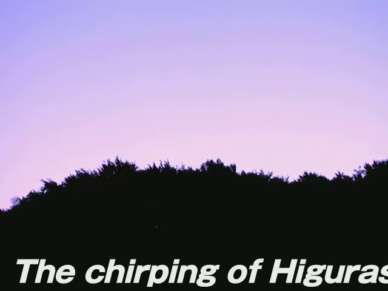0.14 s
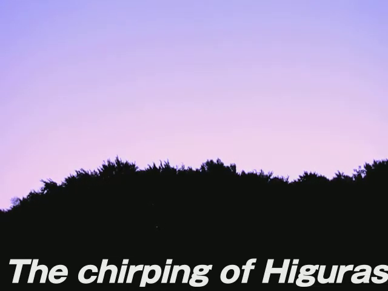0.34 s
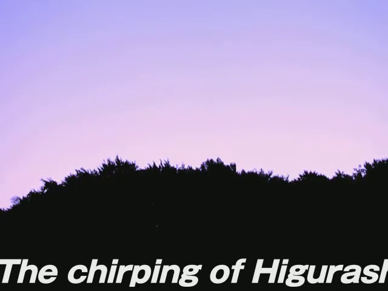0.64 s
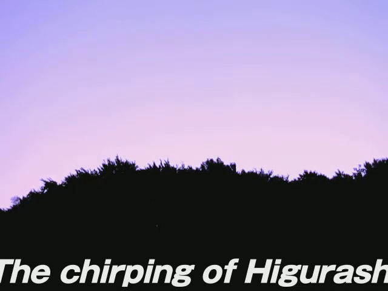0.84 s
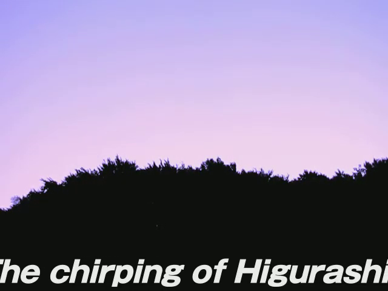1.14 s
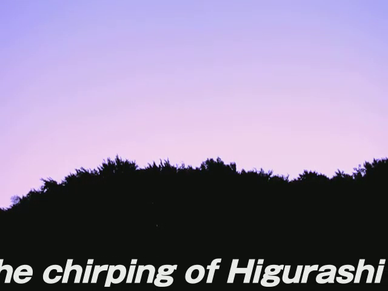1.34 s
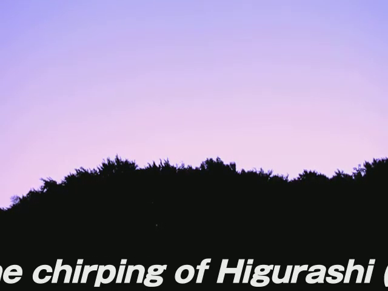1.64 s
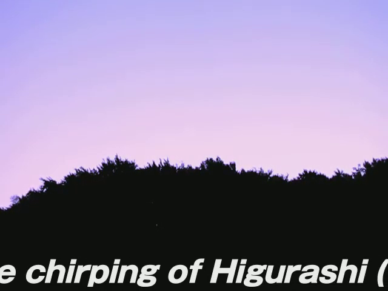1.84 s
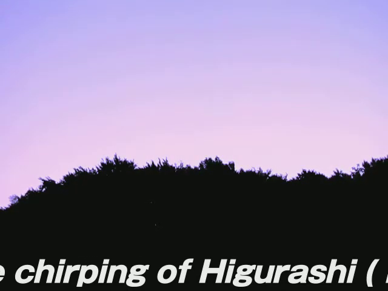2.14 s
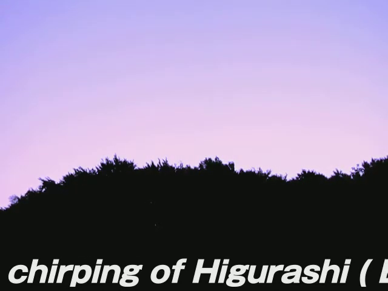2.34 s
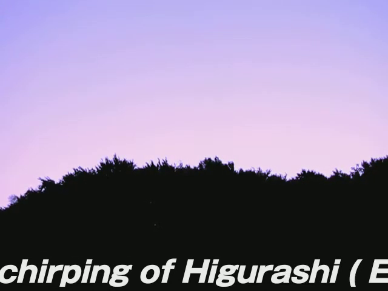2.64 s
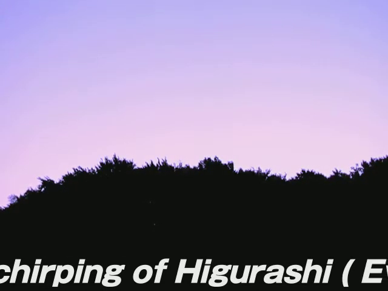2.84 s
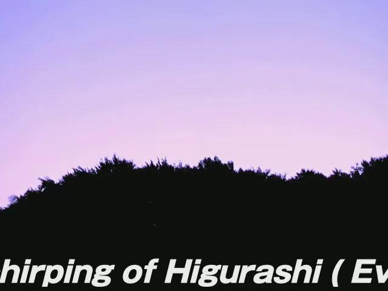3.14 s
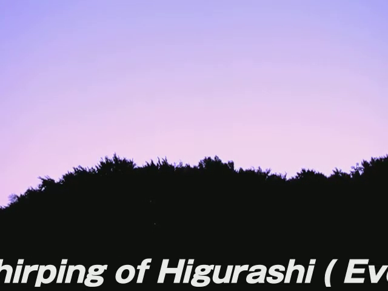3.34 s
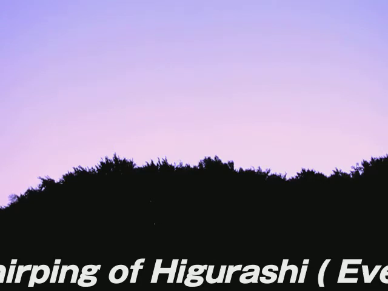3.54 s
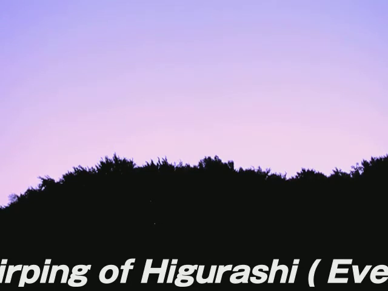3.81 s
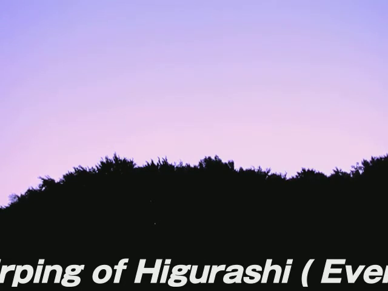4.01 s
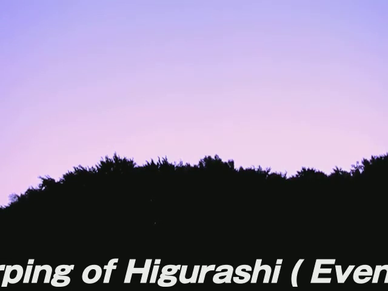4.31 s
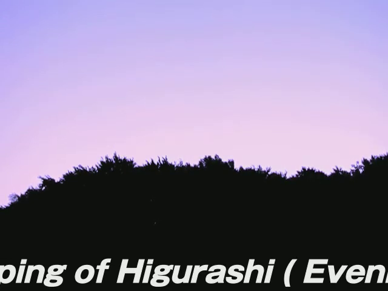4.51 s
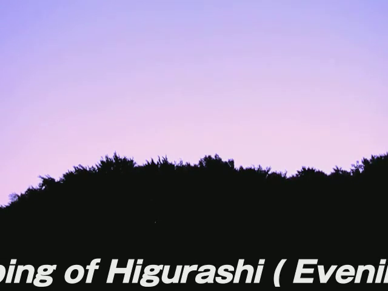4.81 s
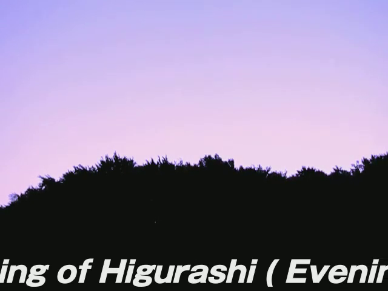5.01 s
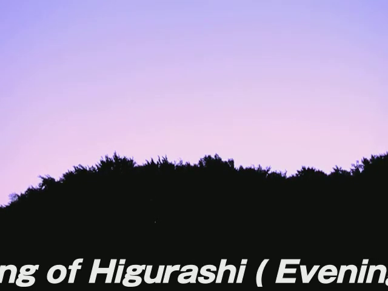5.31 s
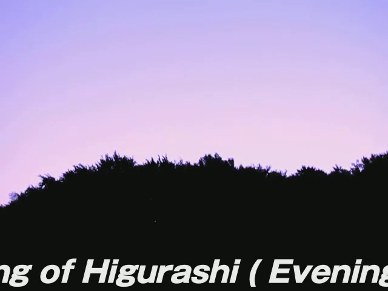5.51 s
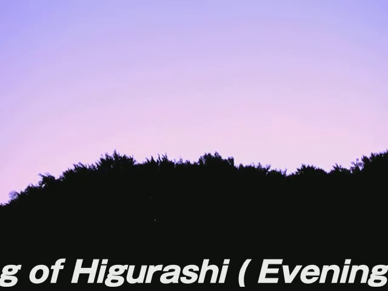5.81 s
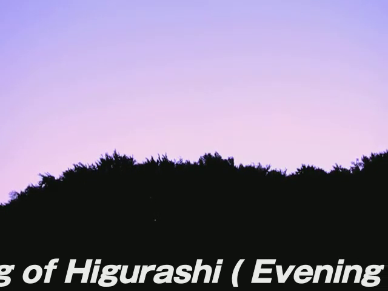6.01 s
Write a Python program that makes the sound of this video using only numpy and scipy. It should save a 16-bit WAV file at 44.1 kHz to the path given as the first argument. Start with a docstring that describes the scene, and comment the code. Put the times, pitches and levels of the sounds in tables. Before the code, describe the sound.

A stereo microphone at the wood's edge takes in layered cicadas: pulsing trains around nine notes a second, a far chorus blending into a ring, and a very high constant insect shimmer. Rasping rising bird screeches come regularly on the left early on, followed by short clear whistles on either side and a few yelps. Later birds thin out, a faint dull tick passes, and distant machinery hums very softly.

```python
"""Evening cicadas are heard first, calling at the edge of a wood at dusk in overlapping trains of quick
high notes: swelling, buzzing tones with strong octaves. A small cicada rings steadily near 8 kHz, as a
comb of click harmonics under a body resonance. Bulbuls screech and whistle, as gliding and fluttering
harmonic tones. Trees and slope scatter the calls as decaying noise echoes. Behind them far machinery
hums as wavering tones, shaped noise gives the valley's rumble and rustle, and one faint tick sounds."""
import sys
import numpy as np
from scipy import signal
from scipy.fft import rfft, irfft, next_fast_len
from scipy.io import wavfile
from scipy.ndimage import uniform_filter1d, map_coordinates

SR = 44100
rng = np.random.default_rng(int(sys.argv[2]) if len(sys.argv) > 2 else 0)


def transcribe(u):
    """Save the signal u as a 16-bit wav file named by the first command-line argument.

    u: samples, shape (n,) or (channels, n), limited to [-1, 1]; the rate is SR.
    q: integer samples, one column per channel.
    """
    v = np.clip(np.atleast_2d(u).T, -1, 1)
    q = np.round(v * 32767).astype(np.int16)
    wavfile.write(sys.argv[1], SR, q)


N = 271656
TIME = np.arange(N) / SR  # s


def near_cicadas(length=.07, sag=.018, rough=.011, low_db=-6, high_db=-8, third_db=-10,
                 wet_db=-3, octave_side_db=6):
    """Resonant radiation: each note is a swell of tymbal buzz; the hollow belly lifts the octave."""
    out, sent = np.zeros((2, N)), np.zeros(N)
    u = np.linspace(0, 1, int(length * SR))  # share of the note
    for s, db, hz, side_db, octave_db in notes():
        sinking = sag * (1 - 2 * u)
        phase = cycles(hz * (1 + sinking + rough * wobble(695, len(u))))
        swell = amp(db - 7) * np.sin(np.pi * u)
        low = amp(low_db) * swell * np.sin(phase)
        overtones = amp(octave_db) * np.sin(2 * phase) + amp(third_db) * np.sin(3 * phase)
        high = amp(high_db) * swell * overtones
        start = s - length / 2
        add(out, start, panned(low, side_db) + panned(high, side_db + octave_side_db))
        add(sent, start, low / 2 + high)
    return out + amp(wet_db) * surrounding(sent)


# Calls of the nearer evening cicadas, each a train of notes:
# (first note [s], last note [s], notes [count], last gap over first gap [ratio], first pitch [Hz],
#  last pitch [Hz], relative level [dB], fade [dB/s], left over right [dB], relative octave level [dB])
NEAR_CALLS = [(-.031, 2.009, 15, 1.93, 2112, 2056, -25, 2.6, -7, 1.5),
              (-.035, .905, 9, 1.05, 2190, 2165, -30, 3, -5, 3),
              (1.14, 2.01, 9, 1.02, 2205, 2145, -30, 3, -5.5, 3),
              (2.135, 3.78, 16, 1.06, 2158, 2134, -29.5, 3, -7, 9),
              (2.783, 4.39, 16, 1.08, 2250, 2200, -26.5, 2.5, -5, -4),
              (4.39, 5.129, 8, 1.0, 2120, 2102, -30.5, 0, -5, -9),
              (5.19, 6.11, 9, 1.0, 2178, 2160, -30.3, -1.5, -5.5, -1)]
DRAG_POWER = 3.4  # the slowing comes late in a call
ONSET_DB, ONSET_S = -7, .09  # a call starts softly and strengthens within a few notes
NOTE_SCATTER_DB, NOTE_SCATTER_HZ = 1, 6  # no two notes are quite alike


def notes():
    """Pulse-train timing: widening gaps, gliding pitch, soft onset and a steady drift of level."""
    for first, last, count, drag, first_hz, last_hz, db, fade, side_db, octave_db in NEAR_CALLS:
        gaps = 1 + (drag - 1) * np.linspace(0, 1, round(count) - 1) ** DRAG_POWER
        for u in np.append(0, np.cumsum(gaps)) / gaps.sum():
            age = u * (last - first)
            level = db + ONSET_DB * np.exp(-age / ONSET_S) - fade * age
            level += NOTE_SCATTER_DB * rng.standard_normal()
            hz = first_hz + (last_hz - first_hz) * u + NOTE_SCATTER_HZ * rng.standard_normal()
            yield first + age, level, hz, side_db, octave_db


# Trains of farther evening cicadas: (start [s], end [s], first pitch [Hz], last pitch [Hz],
#  note rate at the start [1/s], relative level [dB])
FAR_TRAINS = [(-1.2, 2.6, 2225, 2150, 9.3, -40), (-2, 1.9, 2170, 2085, 8.6, -38),
              (.85, 1.7, 2130, 2115, 9.3, -38), (1.9, 5.9, 2170, 2105, 9.5, -43),
              (2.2, 2.95, 2165, 2140, 9.2, -34.5), (2.6, 5.4, 2255, 2180, 9.2, -46),
              (3.8, 7.5, 2130, 2090, 9, -47), (4, 5.3, 2285, 2260, 9.6, -53),
              (5.62, 9, 2265, 2220, 9.8, -35), (6.04, 9, 2150, 2090, 9.3, -26)]
# Blended spectrum of the farthest evening cicadas: (frequency [Hz], relative level [dB])
CHOIR_SPECTRUM = [(1900, -49), (2040, -9), (2115, 7), (2210, 5.5), (2340, -33), (3800, -35), (4100, -5.5),
                  (4260, 2), (4450, -3), (4750, -34.5)]


def far_cicadas(sag=0.011, rough=.013, slowing=.035, low_db=-49.3, third_db=-16, wet_db=2, choir_db=-47):
    """Superposition: trains of notes slow and sink; the farthest callers blend into a steady ring."""
    low, high = np.zeros(N), np.zeros(N)
    for start, end, first_hz, last_hz, rate, db in FAR_TRAINS:
        age = TIME - start
        u = np.clip(age / (end - start), 0, 1)  # share of the train
        beat = (rate * age * (1 - slowing * age / 2) + rng.random()) % 1  # share of the note
        pitch = first_hz + (last_hz - first_hz) * u
        phase = cycles(pitch * (1 + sag * (1 - 2 * beat) + rough * wobble(800)))
        train_swell = np.sqrt(np.abs(np.sin(np.pi * u)))
        swell = amp(db) * train_swell * np.sin(np.pi * beat)
        low += swell * np.sin(phase)
        high += swell * (np.sin(2 * phase) + amp(third_db) * np.sin(3 * phase))
    # the long waves reach both ears alike; the octave is scattered apart
    low = panned(unit(low + surrounding(low)[0]), -7.5)
    high = panned(high + amp(wet_db) * surrounding(high), 3.1)
    return amp(low_db) * low + high + amp(choir_db) * rush(CHOIR_SPECTRUM)


# The small cicada's tymbal: (time [s], mean click rate [1/s])
CLICK_RATE = [(0, 453.5), (1.5, 455), (2.7, 457.2), (3.5, 458.6), (4.4, 460.6), (5.1, 466), (5.6, 476),
              (6.16, 488)]
# The small cicada's ring: (time [s], level [dB], body resonance [Hz])
RINGING = [(0, -39.5, 8080), (1.08, -38, 8090), (2.25, -40.5, 8090), (4.17, -40, 7906), (4.6, -41.3, 7720),
           (5.37, -42.5, 7630), (5.73, -43.5, 7750), (6.16, -42.5, 7650)]
# Spectrum of distant small cicadas: (frequency [Hz], relative level [dB])
HISS_SPECTRUM = [(5000, -46), (6100, -15), (6350, -10.5), (6800, -14), (7400, -12), (8100, -6), (8700, -8),
                 (9200, -21.5), (10300, -20), (11200, -31), (15000, -50)]


def small_cicada(width_hz=520, upper_db=-7, lower_db=-3, between_db=-14, jitter=.0013,
                 tone_db=-1.5, hiss_db=-5, wet_db=-5):
    """Harmonic comb and resonance: ribs click in uneven groups of four under the body's resonance."""
    db, centre_hz = curves(RINGING)
    group_hz = curves(CLICK_RATE)[0] / 4 * (1 + jitter * wobble(160))
    phase = cycles(group_hz)
    pattern = amp([0, upper_db, between_db, lower_db])  # every fourth line is strongest
    tone = np.zeros(N)
    for k in range(60, 85):
        body = 1 / (1 + ((k * group_hz - centre_hz) / width_hz) ** 2)
        tone += pattern[k % len(pattern)] * body * np.sin(k * phase + 2 * np.pi * rng.random())
    ring = unit(tone + amp(wet_db) * surrounding(tone))
    return amp(db) * (amp(tone_db) * ring + amp(hiss_db) * rush(HISS_SPECTRUM))


# Bulbul call shapes: (share of the call [0-1], pitch over the reference pitch [ratio],
#  relative level [dB], buzz depth over the pitch [ratio])
SCREECH_SHAPE = [(0, .46, -22, 0), (.04, .575, -8, .012), (.17, .635, -6, .03), (.27, .70, -.5, .02),
                 (.5, .905, .5, .065), (.72, .99, -2, .025), (.87, 1, -2.5, .006), (.94, .5, -6, .08),
                 (1, .22, -18, .03)]
WHISTLE_SHAPE = [(0, .87, -20, 0), (.14, .935, -7, .002), (.35, .985, -1, .002), (.55, 1, 0, .002),
                 (.75, .988, -1, .002), (.9, .93, -9, .004), (1, .78, -22, .02)]
YELP_SHAPE = [(0, .55, -14, .008), (.1, .745, -3, .01), (.3, .885, 0, .008), (.55, .975, -1, .006),
              (.74, 1, -3, .006), (.86, .92, -1, .015), (1, .56, -7, .02)]
SWEEP_SHAPE = [(0, .47, -8, .015), (.1, .58, 1.5, .015), (.28, .87, -.5, .035), (.45, 1, -6, .04),
               (.62, 1, -10, .03), (.8, .6, -3, .04), (.9, .45, -5, .04), (1, .42, -14, .03)]
CHIP_SHAPE = [(0, 1.14, -6, .02), (.5, 1, 0, .02), (1, .9, -6, .03)]
# Bulbul calls: (start [s], length [s], reference pitch [Hz], relative level [dB], left over right [dB])
SCREECHES = [(-.151, .19, 6280, -29.7, 8), (.204, .191, 6310, -30.7, 11), (.569, .189, 6310, -29.8, 4),
             (.939, .19, 6290, -30.2, 4), (1.299, .191, 6290, -31.3, 4), (4.026, .193, 6240, -28.2, 4),
             (4.435, .193, 6260, -30.1, 10)]
WHISTLES = [(1.203, 0.091, 3427, -25.8, -6), (1.472, 0.082, 3575, -24.8, -5),
            (2.435, 0.12, 3387, -29.7, 12), (3.305, .115, 3360, -29.2, 2), (3.69, .117, 3600, -25.4, 2),
            (5.145, .1, 3350, -36.2, -5), (5.73, 0.086, 3230, -39.6, 8), (5.783, .09, 3260, -33, -5),
            (6.018, 0.092, 3540, -34.4, 3)]
YELPS = [(1.746, .103, 4950, -30.5, -9), (2.72, .102, 3900, -31.3, -3), (3.126, .09, 4080, -34.3, -9)]
SWEEPS = [(.005, .152, 5700, -39, 0), (.35, .155, 5700, -41, 0), (2.063, .15, 5890, -41.3, -1.3),
          (2.388, .17, 5300, -39.5, -2.5), (2.995, .145, 5930, -40.3, -1)]
CHIPS = [(1.853, .022, 2380, -35.5, -2), (1.858, .022, 3490, -35.5, 0), (6.072, .045, 4750, -38, 0)]
FAR_WHISTLES = [(5.23, 0.1, 2870, -53, 0), (5.37, 0.093, 2480, -46, 0), (5.48, .12, 2560, -50, 0)]


def bulbuls():
    """Direct and scattered sound: each kind of call has its own overtones, roughness and echo."""
    birds = bulbul(SCREECHES, SCREECH_SHAPE, wet_db=-5, overtone_db=-3, rough=.009)
    birds += bulbul(WHISTLES, WHISTLE_SHAPE, wet_db=-4, overtone_db=3, rough=.005)
    birds += bulbul(YELPS, YELP_SHAPE, wet_db=-.5, overtone_db=1, rough=.007)
    birds += bulbul(SWEEPS, SWEEP_SHAPE, wet_db=3, overtone_db=1, rough=.018)
    birds += bulbul(CHIPS, CHIP_SHAPE, wet_db=-3, overtone_db=0)
    far = bulbul(FAR_WHISTLES, WHISTLE_SHAPE, wet_db=-0.5, overtone_db=-10, rough=0.033)
    # the far whistles, direct sound and echo, are scattered once more by the trees
    return birds + trees(far[0])[:, :N]


# Partials of the syrinx: (multiple of the pitch [ratio], relative level [dB])
SYRINX = [(.5, -42), (1, 9.5), (1.5, -18), (2, -18), (3, -25.5), (4, -44)]


def bulbul(calls, shape, wet_db, overtone_db, buzz_hz=335, rough=.004, lag_per_db=1.3e-5):
    """Frequency modulation: syrinx flutter roughens a gliding whistle; the far ear hears it later."""
    out = np.zeros((2, N))
    for s, length, reference_hz, db, side_db in calls:
        t = np.arange(int(length * SR)) / SR
        glide, level_db, buzz = curves(shape, t / length)
        flutter = np.sin(cycles(buzz_hz * (1 + 0.1 * wobble(152.4, len(t)))))
        pitch = reference_hz * uniform_filter1d(glide, 256)
        phase = cycles(pitch * (1 + buzz * flutter + rough * wobble(702, len(t))))
        lag = side_db * lag_per_db / 2  # s
        phase = np.interp([t + lag, t - lag], t, phase)
        voice = 0
        for k, part_db in SYRINX:
            gain = amp(part_db + overtone_db * (k != 1))
            voice = voice + gain * np.sin(round(2 * k) / 2 * phase)
        call = unit(voice) * amp(db + level_db) * signal.windows.tukey(len(t), .05)
        add(out, s, panned(call, side_db))
        add(out, s, amp(wet_db) * panned(trees(call), side_db / 4))
    return out


# Faint tick: (time [s], relative level [dB])
TICKS = [(5.12, -37)]


def ticks(t60=0.045, level_db=-3, low_hz=500, high_hz=2600):
    """Exponential decay: a short, dull click of band-limited noise."""
    out, t = np.zeros((2, N)), np.arange(SR // 10) / SR
    band = signal.butter(2, [low_hz, high_hz], "band", fs=SR, output="sos")
    for s, db in TICKS:
        burst = unit(signal.sosfilt(band, rng.standard_normal(len(t))))
        add(out, s, amp(db + level_db) * amp(-60 * t / t60) * burst)
    return out


# Rumble and rustle spectra: (frequency [Hz], relative level [dB])
RUMBLE_SPECTRUM = [(20, -40), (33, -34), (45, -23.5), (65, -15.8), (100, -14.4), (130, -9.6), (200, -8.3),
                   (300, -4.2), (400, -5.8), (500, -9), (800, -15), (1000, -14.8), (1400, -21.5),
                   (1900, -18.4), (2600, -29.5), (4000, -57)]
RUSTLE_SPECTRUM = [(1000, -10), (1800, .5), (2600, -5.2), (3400, 1.4), (5400, -5.6), (9000, -11),
                   (11500, -33), (15500, -41)]
# Hum of far machinery: (frequency [Hz], level [dB])
HUM = [(113, -68), (291, -62), (350, -57), (393, -53), (743, -65)]


def valley(rumble_db=-46.3, air_db=-47.7):
    """Broadband noise and line spectrum: rumble, faint rustle and far machinery's wavering hum."""
    hum = np.zeros(N)
    for hz, db in HUM:
        level = np.sqrt(2) * amp(db + wobble(2.73) / 2)
        hum += level * np.sin(cycles(hz + wobble(3.91) / 2))
    low = panned(amp(rumble_db) * rush(RUMBLE_SPECTRUM) + hum, -1.2)
    return low + amp(air_db) * rush(RUSTLE_SPECTRUM)


# Reverberation of the wood: (frequency [Hz], time to decay by 60 dB [s])
WOOD_DECAY = [(1000, 1.1), (3500, 0.87), (6000, 0.69), (12000, 0.54)]


def trees(x):
    """Diffuse scattering: trunks and slope keep the energy but give each ear a new path."""
    hz, t, z = signal.stft(rng.standard_normal((2, int(SR * .7))), SR, nperseg=256)
    decay = amp(-60 * t / along(WOOD_DECAY, hz)[:, None])
    build_up = 1 - np.exp(-t / 0.0041)
    tail = signal.istft(z * decay * build_up, SR, nperseg=256)[1]
    wet = signal.fftconvolve(np.atleast_2d(x), tail, axes=1)
    energy = np.sum(x ** 2) / x.ndim  # per ear: mono has one dimension, stereo two
    return wet * np.sqrt(energy / np.sum(wet ** 2, axis=1, keepdims=True))


def surrounding(x):
    """Steady-state reverberation: the tail wraps round, so the air is full from the start."""
    echo = trees(x)
    add(echo, 0, echo[:, N:])
    return echo[:, :N]


# Likeness of the two ears in diffuse noise: (frequency [Hz], left-right correlation [0-1])
EAR_LIKENESS = [(30, 0.8), (120, 0.97), (380, 0.96), (700, 0.6), (1500, 0.26), (4000, 0.088), (8000, 0.18)]


def rush(spectrum):
    """Interaural coherence: stereo noise of rms 1, most alike in the bass."""
    def mid_and_side(hz):
        turn = np.arccos(np.clip(along(EAR_LIKENESS, hz), -1, 1)) / 2
        return amp(along(spectrum, hz)) * [np.cos(turn), np.sin(turn)]

    mid, side = filtered(rng.standard_normal((2, N)), mid_and_side)
    return unit(np.array([mid + side, mid - side]))


def panned(x, side_db):
    """Interaural level difference: place a sound between the ears at equal power."""
    return unit(amp([[side_db / 2], [-side_db / 2]])) * x


def cycles(hz):
    """Phase is the running integral of frequency [rad]."""
    return 2 * np.pi * np.cumsum(hz) / SR


def wobble(rate, size=N):
    """Random modulation: a smooth curve with rate knots a second."""
    knots = rng.standard_normal(int(size * rate / SR) + 4)
    return map_coordinates(knots, [np.arange(size) * rate / SR], order=2)


def filtered(x, response):
    """Linear filtering: multiply the spectrum by a response of frequency."""
    m = next_fast_len(N + 8192)
    return irfft(rfft(x, m) * response(np.fft.rfftfreq(m, 1 / SR)), m)[..., :N]


def amp(db):
    """Logarithmic level: decibels to amplitude gain."""
    return 10 ** (np.asarray(db) / 20)


def unit(x):
    """Effective value: scale to rms 1."""
    return x / np.sqrt(np.mean(x ** 2) + 1e-20)


def along(points, hz):
    """Logarithmic frequency scale: interpolate (Hz, value) points."""
    f, v = np.transpose(points)
    return np.interp(np.log(hz + 1), np.log(f + 1), v)


def curves(rows, at=TIME):
    """Linear interpolation: join every column after the first by straight lines."""
    s, *cols = np.transpose(rows)
    return [np.interp(at, s, c) for c in cols]


def add(track, s, sound):
    """Superposition: mix a sound in at time s, cut to the track's ends."""
    start = round(s * SR)
    a, b = max(start, 0), min(start + sound.shape[-1], N)
    if b > a:
        track[..., a:b] += sound[..., a - start:b - start]


def scene():
    """Superposition of insects, birds, the tick and the valley behind them."""
    return near_cicadas() + far_cicadas() + small_cicada() + bulbuls() + ticks() + valley()


TOP_HZ = 15600  # band limit


def record(dry):
    """Band limiting: nothing passes at or above the top frequency."""
    return filtered(dry, lambda hz: hz < TOP_HZ)


dry = scene()
out = record(dry)
transcribe(out)
```